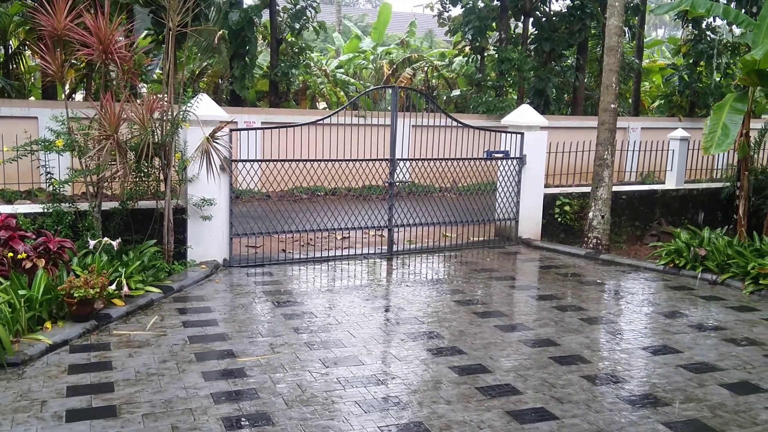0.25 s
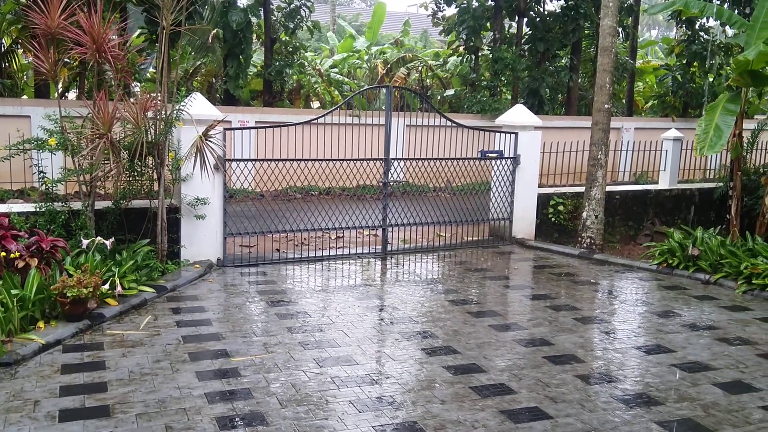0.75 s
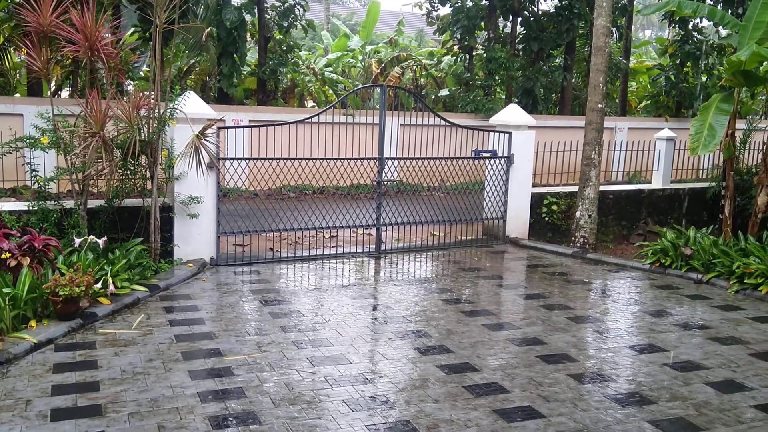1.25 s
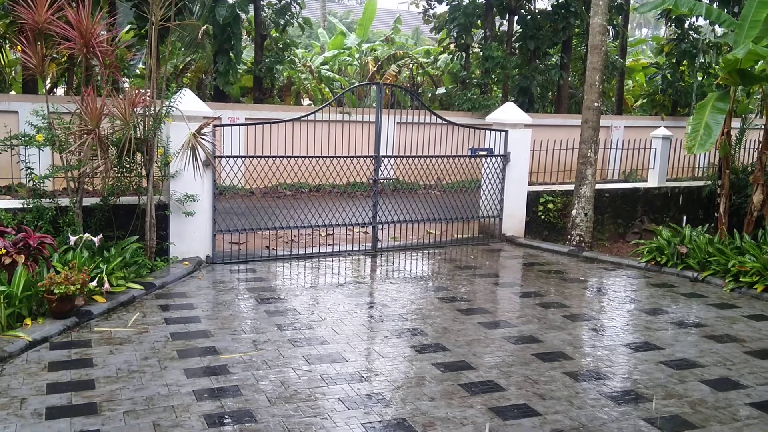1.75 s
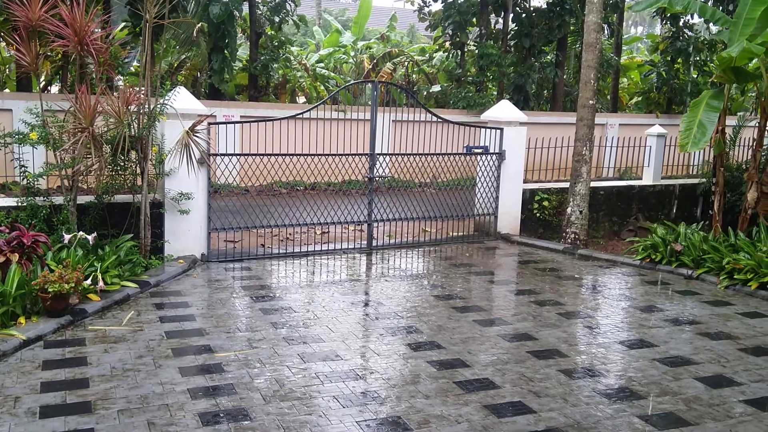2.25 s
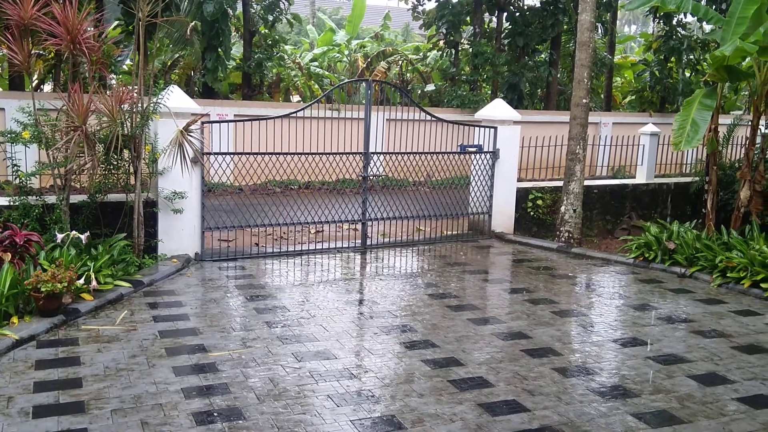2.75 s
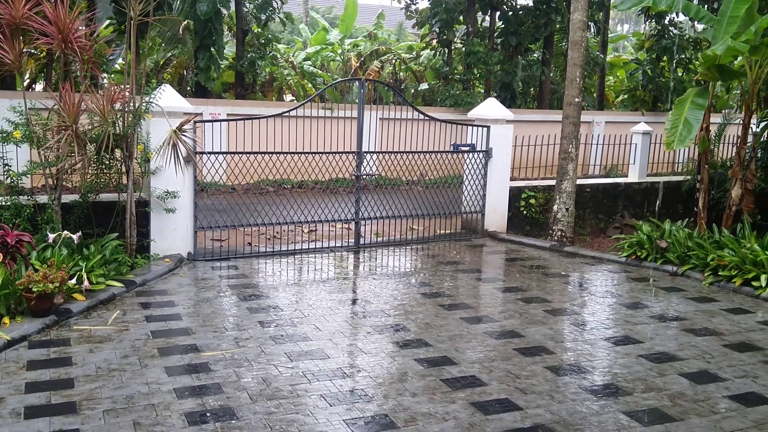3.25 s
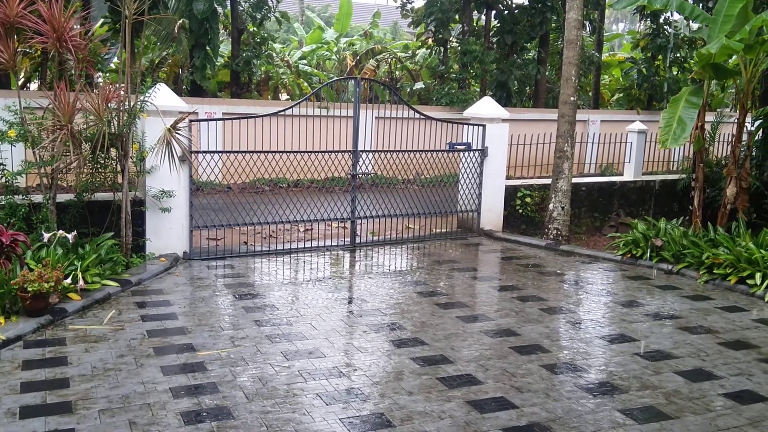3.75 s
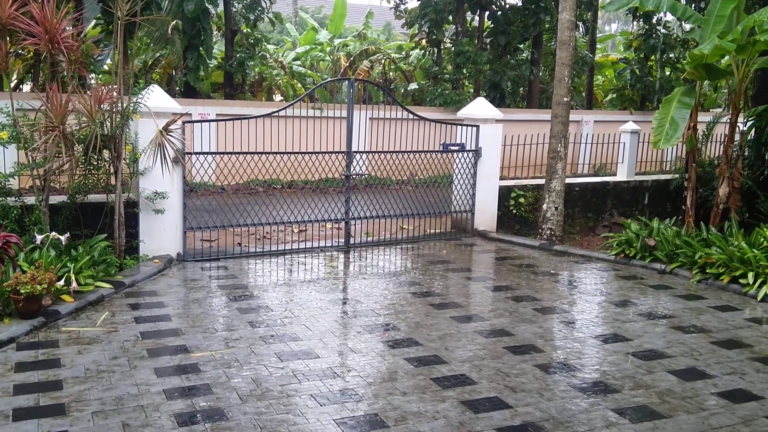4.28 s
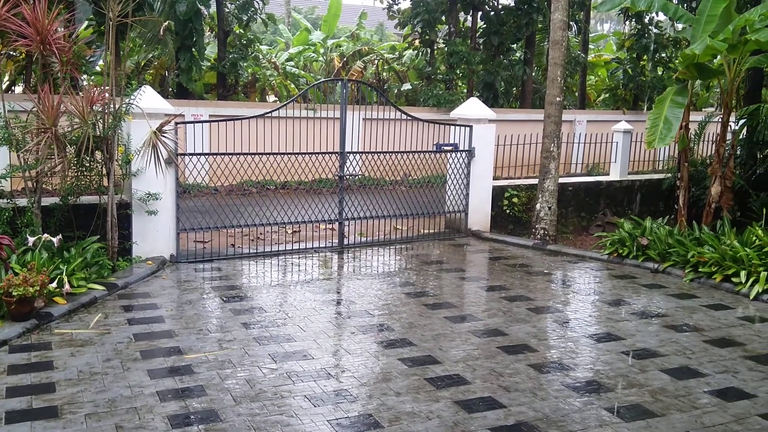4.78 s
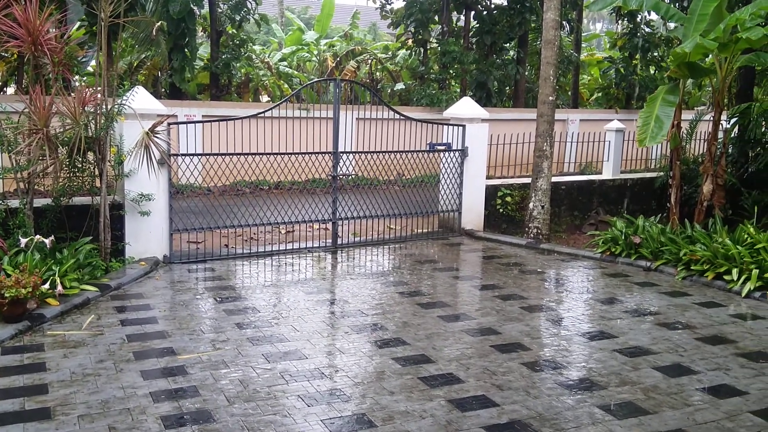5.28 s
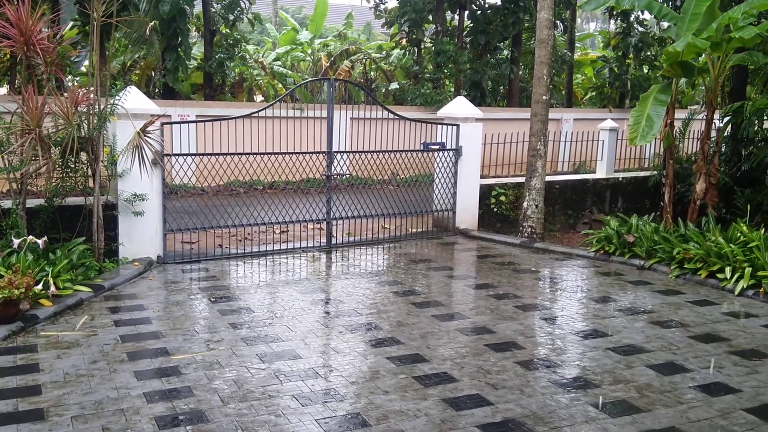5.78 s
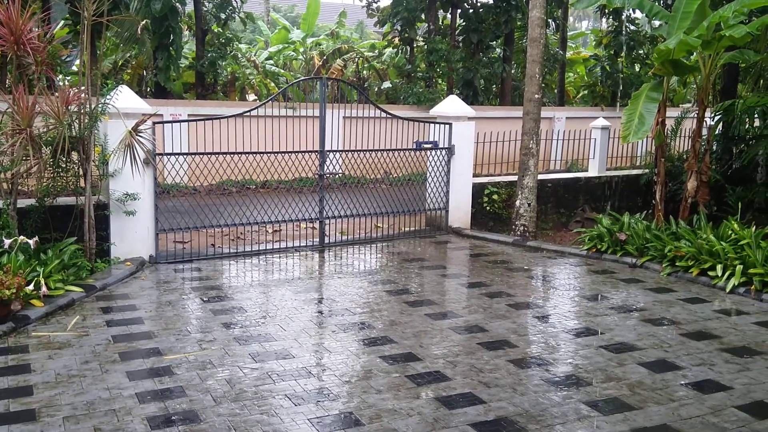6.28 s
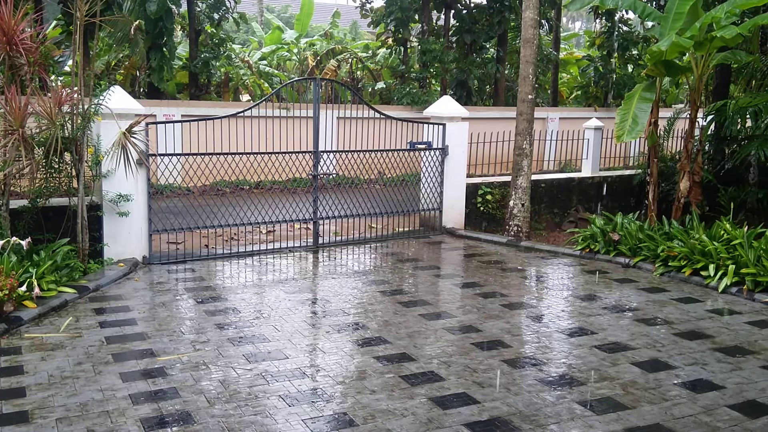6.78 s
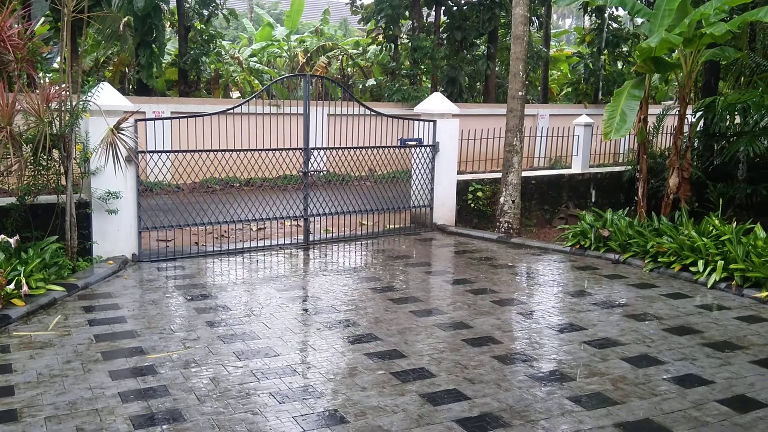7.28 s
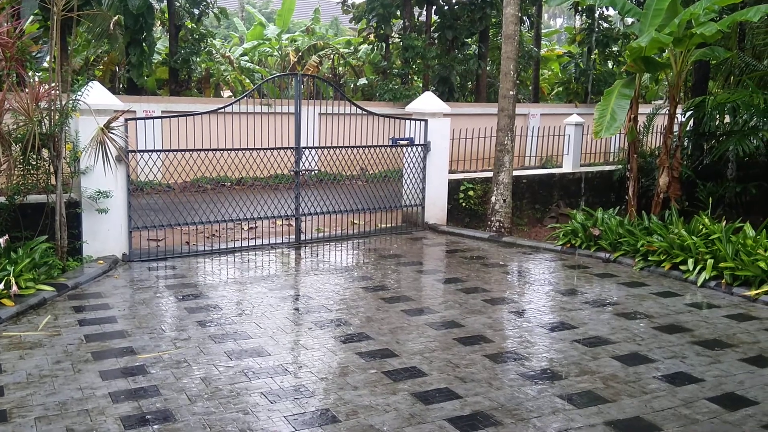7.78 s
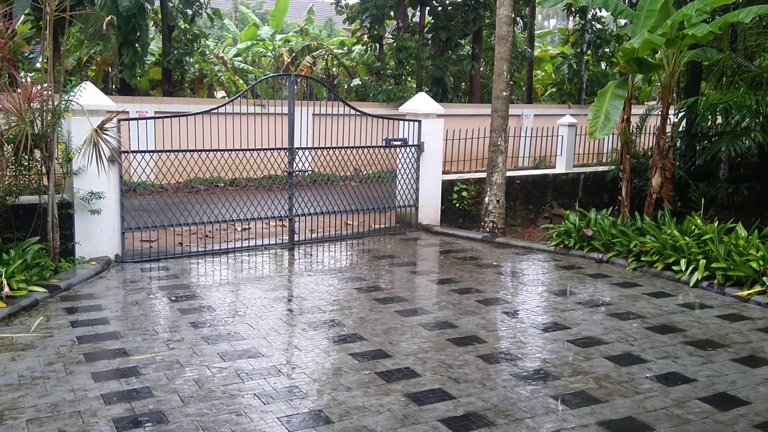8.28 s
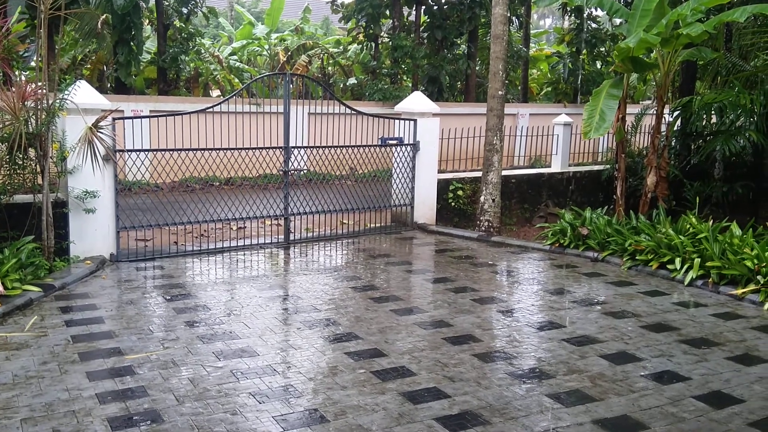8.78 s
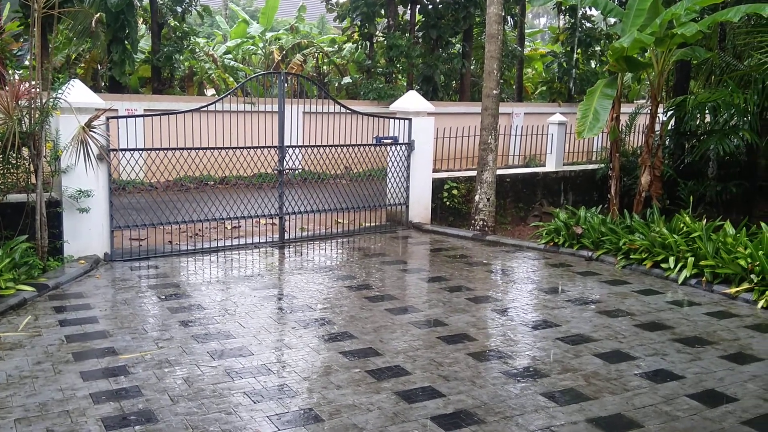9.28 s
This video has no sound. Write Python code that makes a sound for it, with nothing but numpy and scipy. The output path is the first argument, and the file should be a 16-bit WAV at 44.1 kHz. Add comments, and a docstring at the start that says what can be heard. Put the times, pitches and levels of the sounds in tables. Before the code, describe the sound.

Even, soft rain falls on a wet driveway and garden. In front, fat drips from a roof edge smack the paving at irregular gaps, each a sharp plop, tiny ringing bubble and crisp splash, leaning right with a brief porch echo. Small drops tick and plink around them, and runoff gurgles faintly and low. The stereo microphone stands under cover, close to the drips.

```python
"""Fat drips from a roof edge smack wet paving close by, mostly to the right, and echo briefly under a porch.
Each drip sums a plop, a ringing bubble and a splash, all resonances, heard directly and by reflection.
Lighter drips join them, and small drops patter and plink around, each a single short resonance.
Far rain on the driveway and garden is shaped noise, an even wash;
runoff gurgles low as random knocks in a hollow resonance."""
import sys
import numpy as np
from scipy import signal
from scipy.fft import rfft, irfft, next_fast_len
from scipy.io import wavfile
from scipy.ndimage import uniform_filter1d

SR = 44100
rng = np.random.default_rng(int(sys.argv[2]) if len(sys.argv) > 2 else 0)


def wav_record(signal):
    """Record a signal, one row per channel, as 16-bit PCM in the file named by sys.argv[1]."""
    frames = np.transpose(np.atleast_2d(signal))
    bounded = np.clip(frames, -1, 1)
    # unit amplitude maps onto the largest positive 16-bit level
    quanta = np.round(bounded * 32767).astype(np.int16)
    wavfile.write(sys.argv[1], SR, quanta)


N = 420713

# far rain, spectral shape: (frequency [Hz], relative density [dB])
WASH_SPECTRUM = [(20, -24), (38, -22), (56, -5), (90, -6), (277, -1.5), (380, -0.5), (516, -2), (775, 0.15),
                 (1400, -1), (2110, -0.84), (3430, -9.5), (6210, -11.5), (11900, -20.5), (15500, -28)]
WASH_DB = -47  # mean rms level before the slow swell
# far rain, stereo balance: (frequency [Hz], left minus right [dB])
WASH_BALANCE = [(60, -6), (200, -7.5), (700, -6), (1300, -6), (2400, -8.5), (4400, -5), (8000, -4),
                (15000, -1)]
# far rain, correlation of left and right: (frequency [Hz], correlation [-1 to 1])
WASH_CORRELATION = [(60, 0.99), (300, 0.98), (640, 0.58), (1400, -0.27), (3000, 0.1), (15000, -0.15)]

# spurts of runoff: (first glug [s], length [s], relative level [dB])
RUNOFF_SPURTS = [(0.342, .13, -52), (.72, 0.099, -54), (0.988, 0.12, -44.5), (1.69, .04, -46),
                 (1.999, 0.094, -46), (2.55, 0.17, -51), (2.837, 0.2, -52), (3.396, 0.045, -43),
                 (3.82, 0.24, -51.5), (4.358, 0.044, -42.5), (5.172, 0.045, -43), (5.904, .03, -45),
                 (6.21, .02, -52), (6.45, .02, -50), (6.685, 0.095, -53.5), (7.8, .18, -52),
                 (8.456, .02, -54), (8.703, .03, -48), (8.99, .1, -51)]
SPURT_ATTACK_S, SPURT_RELEASE_S = 0.057, 0.028
TRICKLE_DB, TRICKLE_WAVER_DB = -69, 6.5  # relative, on the scale of the spurts
GLUG_PERIOD_S, GLUG_DIP_DB = 0.1, 7.5  # a long spurt breaks up into glugs

# porch echoes from wall, roof and pillar: (delay [s], decay of power [s], relative level [dB])
PORCH_ECHOES = [(.0036, .001, -6), (.0118, .002, -5), (.026, .004, -13)]
PORCH_T60_S, PORCH_TAIL_DB = 0.23, 11.5  # tail level is on the scale of the echoes
ECHO_DULL_HZ = 17900
DROP_SIZE = 8192  # samples in the sound of one drop
LEVEL_SPAN_S = 0.05  # a drop's level is its energy averaged over this span

# fat drips from the roof edge: (time [s], plop pitch [Hz], plop level [dB], plop width [octaves],
#   bubble pitch [Hz], bubble level [dB], splash pitch [Hz], splash level [dB], splash width [octaves],
#   shift to the left [dB], direct over echo [dB]); levels and direct over echo are relative
ROOF_DRIPS = [(0.065,2880,-54,0.04,6500,-44,9900,-41,0.64,5,-1),
              (0.116,4300,-47.5,0.11,11940,-44.5,8100,-48.5,0.11,-1,2),
              (0.334,4660,-49.5,0.09,8570,-51,7400,-44.5,0.22,0,-2),
              (0.616,4190,-60,0.15,7970,-38,10800,-34,0.47,2,-2),
              (0.636,2540,-50,0.12,8800,-39,9400,-32.5,0.46,0,-15),
              (0.673,2480,-28.5,0.16,4220,-36,8100,-34,0.56,1,-1.5),
              (0.769,3540,-52,0.04,2850,-50,12880,-47,0.12,-14,0),
              (0.898,4360,-27,0.32,5660,-39,9400,-35.5,0.26,0,0.5),
              (0.98,4620,-42,0.045,3830,-45,5610,-41.5,0.77,-3,-1),
              (1.028,4200,-41,0.23,2870,-43,6600,-44.5,0.1,-1,-9),
              (1.343,2000,-47.5,0.029,2040,-56,5980,-68,0.12,-13,2),
              (1.432,2950,-58,0.056,3480,-46.5,6250,-54,1.0,1,-14),
              (1.513,1770,-31.5,0.26,2830,-38,3130,-33.5,0.13,0,-16),
              (1.662,2030,-61,0.06,12400,-49,7610,-45,0.42,0,-1),
              (2.141,2240,-51,0.35,2820,-41.5,7190,-44.5,0.31,2,-3),
              (2.386,3500,-42.5,0.12,8530,-32.5,6840,-34,0.63,2,-4),
              (2.794,3820,-57,0.1,6260,-51,6700,-44.5,0.49,1,1),
              (3.199,4160,-43.5,0.18,8500,-46,9520,-43.5,0.85,3,-8),
              (3.223,4480,-43.5,0.054,8640,-43.5,14500,-41,0.26,2,-2),
              (3.434,1410,-62,0.08,13140,-45,12590,-42.5,0.61,-7,4),
              (3.55,1430,-60,0.04,13800,-40,8960,-37,0.12,3,-1),
              (3.587,1980,-40,0.055,1580,-49,7320,-43,1,-4,-2),
              (3.64,2500,-53,0.15,11360,-47,10560,-40,0.84,1,0.5),
              (3.668,2730,-33.5,0.16,3260,-40.5,13190,-52,1.0,1,-1),
              (3.753,4500,-53,0.15,7100,-39.5,6800,-47,0.1,1,1),
              (4.32,2780,-36,0.17,4670,-41,7480,-35.5,0.16,2,-9),
              (4.359,2990,-29.5,0.1,4600,-32,4800,-30,1,-1,1.5),
              (4.429,3130,-49,0.22,4600,-46,8150,-36,0.19,4,-7),
              (4.613,1770,-35,0.22,3780,-44,8540,-34.5,0.25,1,-5),
              (4.809,3160,-31.5,0.21,4620,-37,7900,-39.5,0.19,-2.5,-4.5),
              (5.056,1780,-63,0.04,12800,-44,7200,-50.5,0.4,1,-11),
              (5.327,2820,-45,0.044,1700,-52,11980,-51,0.091,1,2),
              (5.692,2840,-43.5,0.049,2460,-41,3000,-43,0.37,-3,1),
              (5.765,1390,-65,0.074,8230,-42.5,6850,-44,0.23,3,4),
              (5.835,2680,-48,0.035,2840,-41,3000,-59,0.44,-11,-4),
              (6.009,4760,-46.5,0.17,3130,-50.5,14400,-47,0.31,-4,-5),
              (6.229,4580,-65,0.083,7370,-44.5,8330,-48,1.0,2,-4),
              (6.261,2770,-58,0.05,7080,-41,6900,-43,0.5,1,3),
              (6.483,4200,-52,0.13,7270,-42.5,14500,-36,0.98,2,1.5),
              (6.739,2990,-43,0.04,3760,-47.5,3080,-56,0.54,-8,-7),
              (6.904,3030,-51,0.033,2870,-41,5440,-59,0.1,-1,-1),
              (7.086,3920,-49.5,0.027,4800,-51,9100,-56,0.13,-4,10),
              (7.228,2170,-51,0.13,2530,-35.5,3640,-43.5,0.11,-3,-3),
              (7.387,4150,-47.5,0.16,8230,-48,7680,-44.5,0.99,0,0),
              (7.56,4900,-51,0.06,2700,-53.5,9200,-72,0.15,-10,-5),
              (7.725,2980,-40.5,0.053,2850,-38.5,12000,-46,0.067,-1,3),
              (7.79,5480,-31,0.13,6360,-30.5,7000,-31,0.17,-4.5,5),
              (8.114,5400,-54,0.043,4540,-56,5540,-47,0.8,0,-1),
              (8.231,4520,-49,0.04,2810,-58,4500,-51.5,0.7,-7,1),
              (8.566,2000,-31,0.19,2033,-36.5,4500,-57,0.3,-3,-9),
              (8.735,3230,-32,0.15,4420,-37.5,8000,-34.5,0.48,0,-11.5),
              (8.823,4710,-35,0.069,6440,-29.5,7840,-24,0.21,-1,-12),
              (8.918,1800,-58,0.06,11760,-47.5,14200,-42,0.32,2,6),
              (9.159,3200,-44.5,0.32,4120,-44,7140,-47.5,0.073,4,-7),
              (9.296,2900,-39,0.096,3950,-42,5360,-40.5,0.67,1,2),
              (9.396,1470,-57,0.045,11200,-42,14500,-41,0.78,4,2),
              (9.462,2800,-61,0.04,11860,-43,13100,-47,1,1,6)]
# drips, stereo balance: (frequency [Hz], left minus right [dB])
DRIP_BALANCE = [(1400, -25), (2100, -6), (2850, -30.5), (3700, -5.5), (4300, -1.5), (5400, 0),
                (6300, -12.5), (7700, -7), (9200, -6), (11500, 8.5), (13800, -6), (15500, -23)]
REBOUND_DB, REBOUND_S = -9, (0.0035, 0.014)  # a droplet thrown up by a drip lands this soon after it
# deep blips in puddles: (time [s], pitch [Hz], relative level [dB])
PUDDLE_BLIPS = [(4.115, 307, -56), (4.123, 1190, -56.5), (5.515, 406, -56.5), (7.961, 1140, -57)]

TOP_HZ = 16000


def undb(db):
    """Level definition: decibels to amplitude gain."""
    return 10 ** (np.asarray(db) / 20)


def along(points, hz):
    """Logarithmic pitch scale: interpolate (frequency, value) points in log frequency."""
    f, value = np.transpose(points)
    return np.interp(np.log(np.maximum(hz, 1)), np.log(f), value)


def unit(x):
    """Energy normalization: scale each row to rms 1."""
    return x / np.sqrt(np.mean(np.abs(x) ** 2, axis=-1, keepdims=True) + 1e-30)


def walk(rate_hz):
    """Slow random modulation: held random values, smoothed twice by a moving average, near rms 1."""
    hold = int(SR / rate_hz)
    steps = np.repeat(rng.standard_normal(N // hold + 1), hold)
    smooth = uniform_filter1d(uniform_filter1d(steps, hold), hold)
    return unit(smooth)[:N] if len(smooth) == N else unit(smooth[:N])


def sides(balance_db):
    """Intensity stereophony: left and right gains of mean power 1."""
    gain = undb(np.array([[0.5], [-0.5]]) * balance_db)
    return gain / np.sqrt(np.mean(gain ** 2, axis=0))


def resonance(f, hz, octaves, order=6):
    """Cascaded resonators: a steep causal band around hz, of unit energy; a narrower band rings longer."""
    f = np.maximum(f, 1)
    detuning = f / hz - hz / f
    return unit((1 + 1j * 0.3 / max(octaves, 0.01) * detuning) ** -order)


def add(out, time_s, sound):
    """Superposition: mix a stereo drop in at its time."""
    start = int(np.clip(time_s * SR, 0, N - 1))
    out[:, start:start + DROP_SIZE] += sound[:, :N - start]


def wash(flicker_db=-0.6, swell_db=0.87):
    """Incoherent summation: countless far drops merge into noise, with correlated bass and a slight flicker."""
    f = np.arange(N // 2 + 1) * SR / N
    correlation = np.clip(along(WASH_CORRELATION, f), -0.99, 0.99)
    mid, side = rfft(rng.standard_normal((2, N)))
    # sum and difference of two independent noises set the correlation
    stereo = np.sqrt(1 + correlation) * mid + np.sqrt(1 - correlation) * side * np.array([[1], [-1]])
    stereo = stereo * sides(along(WASH_BALANCE, f)) * undb(along(WASH_SPECTRUM, f))
    low = stereo / (1 + (f / 1200) ** 4)
    high = stereo - low
    # lows and highs flicker independently
    out = sum(irfft(band, N) * undb(flicker_db * walk(14)) for band in (low, high))
    return out / np.std(out) * undb(WASH_DB + swell_db * walk(0.82))


def flow():
    """Amplitude modulation: a wavering trickle, and spurts that swell, glug and die away."""
    t = np.arange(N) / SR
    out = undb(TRICKLE_DB + TRICKLE_WAVER_DB * walk(16))
    for start_s, length_s, level_db in RUNOFF_SPURTS:
        # the swell is complete at the first glug
        swell = np.clip(1 + (t - start_s) / SPURT_ATTACK_S, 0, 1)
        phase = np.pi * np.clip(t - start_s, 0, length_s) / GLUG_PERIOD_S
        glugs = undb(level_db - GLUG_DIP_DB * np.sin(phase) ** 2)
        release = np.exp(-np.maximum(t - start_s - length_s, 0) / SPURT_RELEASE_S)
        out = out + glugs * swell * release
    return out


def runoff(count=3000, gurgle_hz=188, octaves=0.43, gain_db=-3.0, balance_db=-17):
    """Cavity resonance: dense random knocks excite a low hollow resonance, loud as the flow."""
    knocks = np.zeros(N)
    knocks[rng.integers(0, N, count)] = rng.choice([-1, 1], count)
    size = next_fast_len(N)
    f = np.arange(size // 2 + 1) * SR / size
    body = irfft(rfft(knocks, size) * resonance(f, gurgle_hz, octaves), size)[:N]
    # even out the running level, so that the flow alone sets how loud each spurt is
    body = body / np.sqrt(uniform_filter1d(body ** 2, size=3000) + 1e-12)
    return sides(balance_db) * body * flow() * undb(gain_db)


def porch_envelope():
    """Early reflections and reverberation: smeared echoes over a short diffuse tail, of unit energy."""
    t = np.arange(DROP_SIZE) / SR
    tail = unit(undb(-60 * t / PORCH_T60_S) * (1 - np.exp(-t / 0.00022)))
    power = tail ** 2 * undb(PORCH_TAIL_DB) ** 2
    for delay_s, spread_s, level_db in PORCH_ECHOES:
        echo = unit((t > delay_s) * np.exp(-np.abs(t - delay_s) / (2 * spread_s)))
        power = power + (undb(level_db) * echo) ** 2
    return np.sqrt(power / power.sum())


def landing(f, spectrum, porch, direct_db, ripple):
    """Direct and reflected sound: a drop and its porch echoes, comb-coloured by nearby surfaces."""
    # the right channel hears it a little later
    lag_s = np.array([[0], [rng.uniform(0.000307, 0.000499)]])
    direct = undb(direct_db) * np.exp(-2j * np.pi * f * lag_s)
    # glances off kerb and wall comb the echoes into bands
    delays_s = rng.uniform(0.000576, 0.004, size=3)
    glances = sum(rng.normal() * np.exp(-2j * np.pi * f * delay) for delay in delays_s)
    echoes = rfft(porch * rng.standard_normal((2, DROP_SIZE))) * unit(1 + ripple * unit(glances))
    # rough walls swallow some treble
    dulled = echoes / np.hypot(1, f / ECHO_DULL_HZ)
    heard = unit(spectrum * (direct + dulled))
    # colouring leaves the drop's energy in each channel as it was
    power = np.mean(np.abs(spectrum) ** 2, axis=1, keepdims=True)
    return irfft(heard * np.sqrt(power * LEVEL_SPAN_S * SR))


def patter(f, porch, count, low_hz, high_hz, octaves, level_db, spread_db, direct_db):
    """Random impacts: small drops, each of its own pitch and place, many faint and a few clearer."""
    out = np.zeros((2, N))
    for when, pitch, width, side, size in rng.random((count, 5)):
        ring = resonance(f, low_hz + (high_hz - low_hz) * pitch, octaves * (0.5 + width))
        level = undb(level_db - spread_db * np.log(0.037 + size))
        gain = level * sides(-3 + 12 * (side - 0.5))
        add(out, when * N / SR, landing(f, gain * ring, porch, direct_db, ripple=0.39))
    return out


def drop(f, plop_hz, plop_db, plop_width, bubble_hz, bubble_db, splash_hz, splash_db, splash_width, shift_db):
    """Impact on a water film: the dent plops, a trapped bubble rings, the crown splashes."""
    plop = undb(plop_db) * resonance(f, plop_hz, plop_width)
    bubble = undb(bubble_db) * resonance(f, bubble_hz, 0.057)
    # the crown falls back within a millisecond and ripples the spectrum
    fall_s = rng.uniform(0.000477, 0.000954)
    crown = 1 + 1.25 * np.exp(-2j * np.pi * (f * fall_s + rng.random()))
    splash = undb(splash_db) * unit(crown * resonance(f, splash_hz, splash_width))
    # fine spray adds a faint wide tick
    spray = undb(splash_db - 17) * unit(crown * resonance(f, 9300, 0.94))
    # so small a source radiates hardly any bass
    radiation = 1 / np.sqrt(1 + (1350 / np.maximum(f, 1)) ** 12)
    return (plop + bubble + splash + spray) * radiation * sides(along(DRIP_BALANCE, f) + shift_db)


def light_drips(f, porch, count=36, plop_db=-58, bubble_db=-59, splash_db=-54, range_db=9,
                splash_octaves=0.67, direct_db=-1):
    """Jittered periodicity: lighter drips at a loose, even pace, each with its own pitch and strength."""
    out = np.zeros((2, N))
    for k, (when, plop, bubble, splash, *sizes) in enumerate(rng.random((count, 7))):
        plop_shift, bubble_shift, splash_shift = range_db * (np.array(sizes) - 0.5)
        spectrum = drop(f, 2500 * 2 ** plop, plop_db + plop_shift, 0.13,
                        4400 * 2 ** bubble, bubble_db + bubble_shift,
                        6000 * 2 ** splash, splash_db + splash_shift, splash_octaves, shift_db=0)
        add(out, (k + when) / count * N / SR, landing(f, spectrum, porch, direct_db, ripple=0.54))
    return out


def drips(f, porch, gain_db=1.84, direct_lift_db=-3.0, blip_lift_db=4.5):
    """Impact and rebound: fat drips, each with a delayed second droplet, and the odd deep puddle blip."""
    out = np.zeros((2, N))
    delays_s = rng.uniform(*REBOUND_S, len(ROOF_DRIPS))
    for (time_s, *shape, direct_db), delay_s in zip(ROOF_DRIPS, delays_s):
        rebound = unit(1 + undb(REBOUND_DB) * np.exp(-2j * np.pi * f * delay_s))
        spectrum = rebound * drop(f, *shape)
        sound = landing(f, spectrum, porch, direct_db + direct_lift_db, ripple=0.68)
        # start a little early, as the resonances take time to build up
        add(out, time_s - 0.0007, undb(gain_db) * sound)
    for time_s, hz, level_db in PUDDLE_BLIPS:
        blip = undb(level_db + blip_lift_db) * sides(-20) * resonance(f, hz, 0.12)
        add(out, time_s, landing(f, blip, porch, direct_db=3, ripple=0.34))
    return out


def scene():
    """Superposition: wash and runoff behind, ticks on stone and plinks in puddles, and the near drips."""
    f = np.arange(DROP_SIZE // 2 + 1) * SR / DROP_SIZE
    porch = porch_envelope()
    background = wash() + runoff()
    ticks = patter(f, porch, count=520, low_hz=3630, high_hz=14000, octaves=0.34,
                   level_db=-64.0, spread_db=2.5, direct_db=-10.5)
    plinks = patter(f, porch, count=170, low_hz=1877, high_hz=11510, octaves=0.039,
                    level_db=-60, spread_db=3.5, direct_db=-7.0)
    return background + ticks + plinks + light_drips(f, porch) + drips(f, porch)


def record(dry):
    """Band limitation: a steep elliptic low-pass in the recorder cuts the top."""
    lowpass = signal.ellip(10, 0.2, 80, TOP_HZ, fs=SR, output="sos")
    return signal.sosfilt(lowpass, dry)


dry = scene()
out = record(dry)
wav_record(out)
```